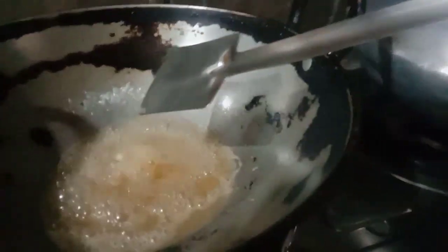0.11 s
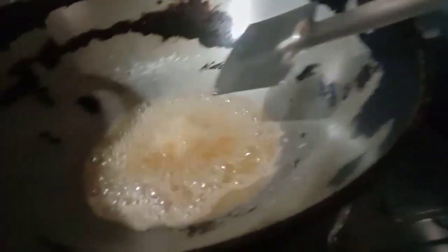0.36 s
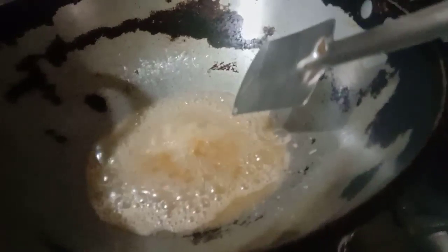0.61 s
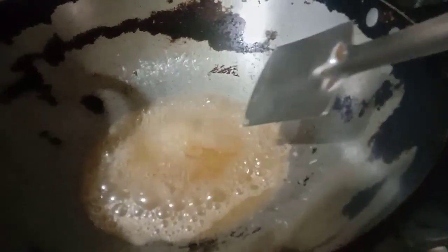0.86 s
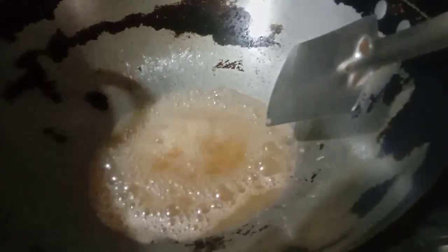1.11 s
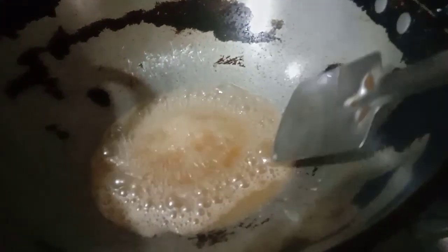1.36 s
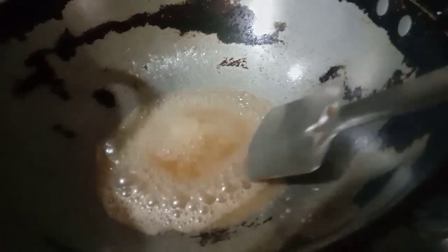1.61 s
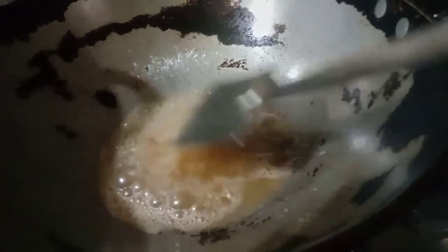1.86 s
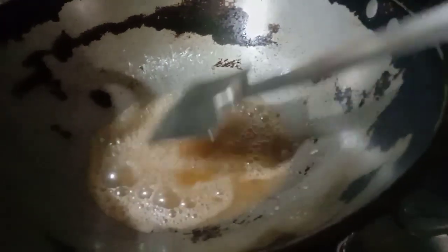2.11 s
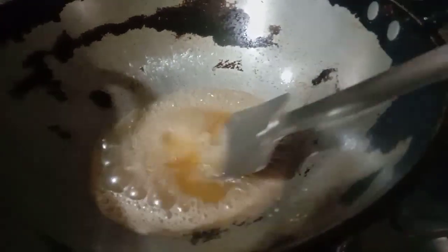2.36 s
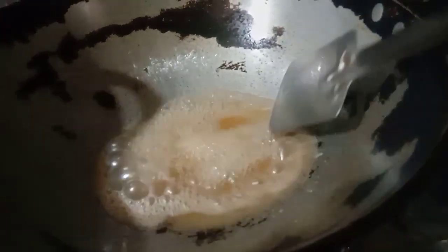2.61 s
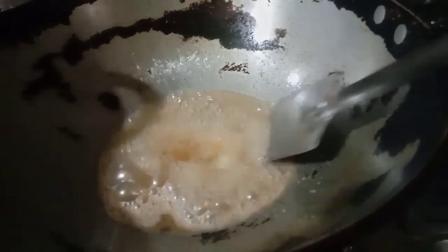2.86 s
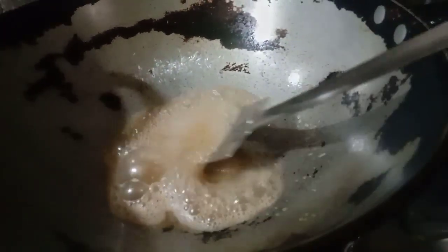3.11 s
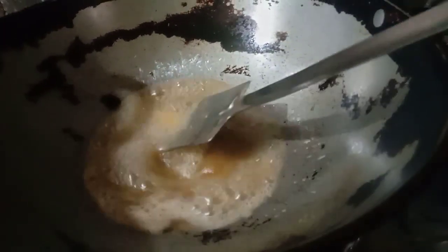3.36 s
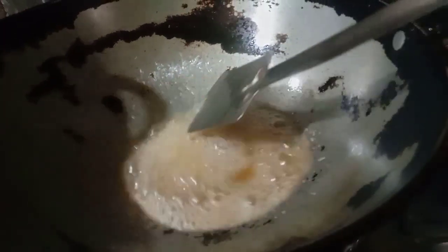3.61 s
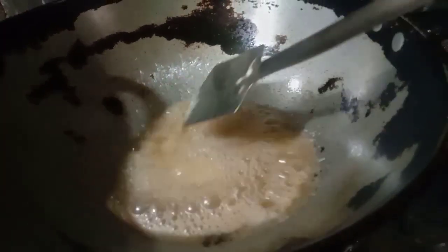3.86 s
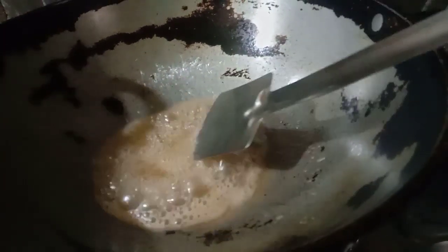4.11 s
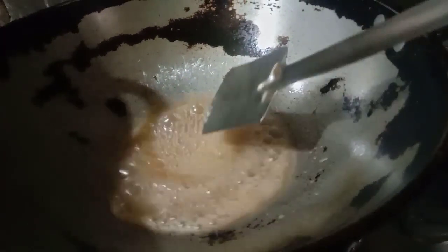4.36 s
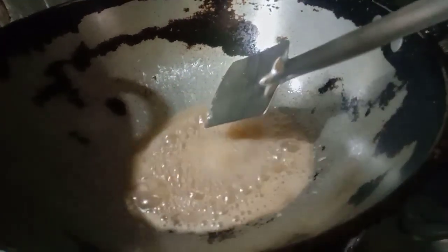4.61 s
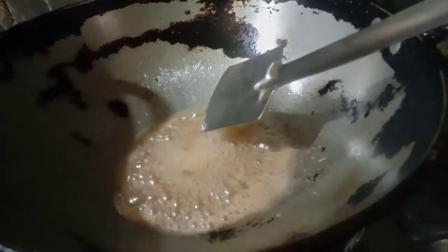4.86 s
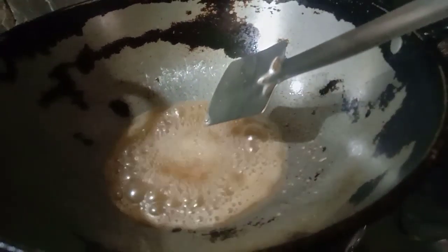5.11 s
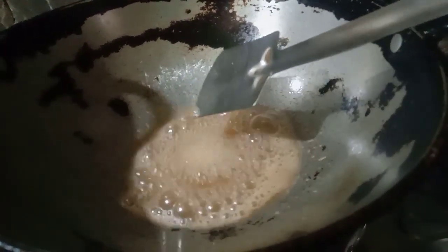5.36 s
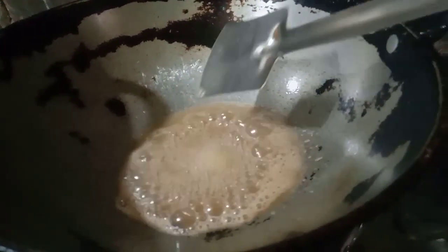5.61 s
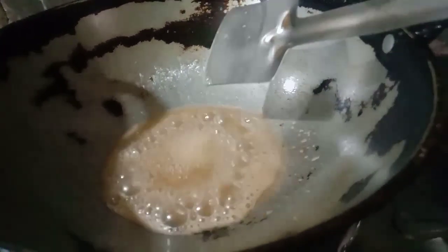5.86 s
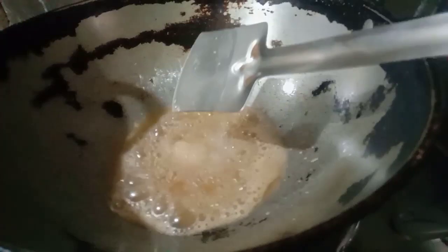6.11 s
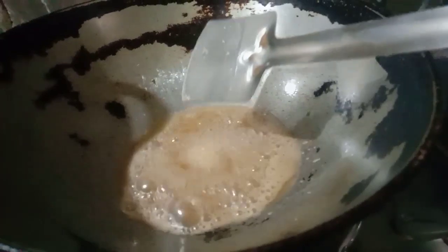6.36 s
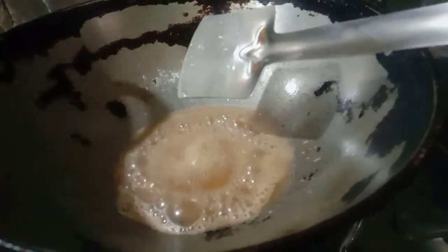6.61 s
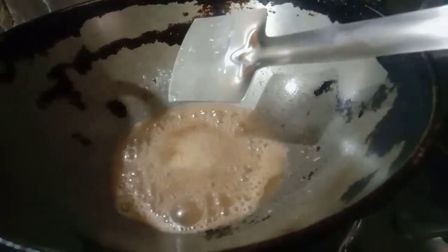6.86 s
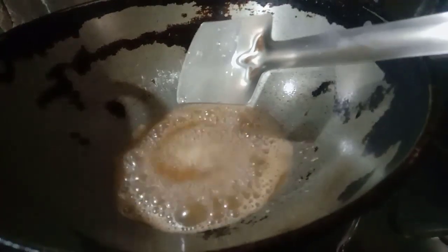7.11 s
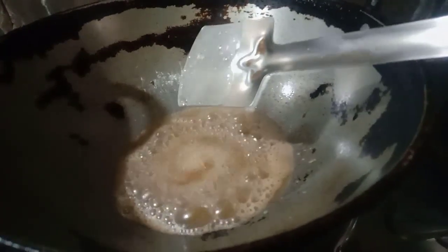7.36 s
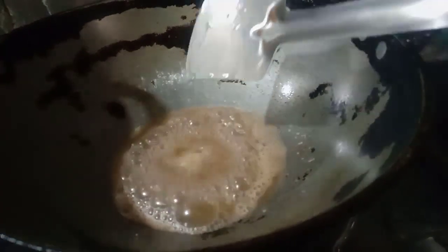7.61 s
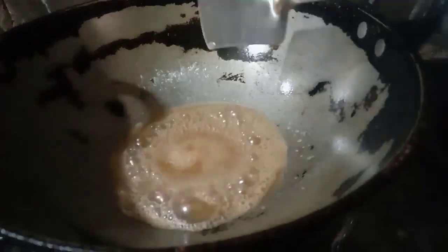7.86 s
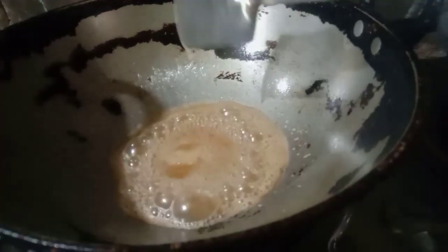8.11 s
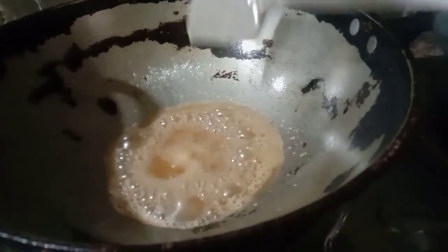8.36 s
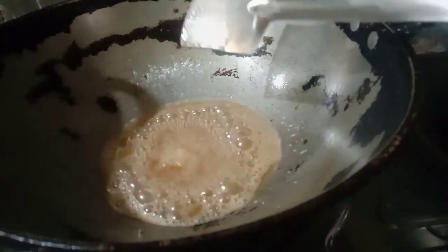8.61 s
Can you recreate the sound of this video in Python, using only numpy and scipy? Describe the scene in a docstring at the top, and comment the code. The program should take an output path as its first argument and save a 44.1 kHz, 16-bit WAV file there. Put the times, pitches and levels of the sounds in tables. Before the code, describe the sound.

Butter foaming in hot oil sizzles brightly and steadily, crackling with sharp pops while a metal spatula faintly rubs the steel pan.

```python
"""At a kitchen stove: butter foams in hot oil in a wide steel pan, the microphone close above it.
Countless small bubbles, damped sines fired at random, burst into a bright sizzle; larger ones pop and
spit, and a few deep ones plop. All of them ring the pan faintly through narrow resonances.
A metal spatula rubs the pan now and then: low shudders of noise, two short groans, a drag and one soft
bump. A faint low room noise lies behind."""
import sys
import numpy as np
from scipy import signal
from scipy.fft import rfft, irfft
from scipy.io import wavfile
from scipy.ndimage import uniform_filter1d

SR = 44100
rng = np.random.default_rng(int(sys.argv[2]) if len(sys.argv) > 2 else 0)


def master_out(mix):
    """Clip the mix to full scale and print it as 16-bit PCM to the path in sys.argv[1]."""
    frames = np.transpose(np.atleast_2d(mix))
    ceiling = np.clip(frames, -1, 1)
    pcm = np.round(ceiling * 32767).astype(np.int16)
    wavfile.write(sys.argv[1], SR, pcm)


def gain_from_db(level_db):
    """Turn a decibel level (scalar or array-like) into a linear amplitude factor."""
    decades = np.asarray(level_db, float) / 20
    return 10 ** decades


N = 384993


def evened(x):
    """Scales a sound to rms 1."""
    return x / np.sqrt(np.mean(x ** 2) + 1e-20)


def read_spectrum(points, hz):
    """Reads a table of (f/Hz, level/dB) at any frequency, on a logarithmic frequency scale."""
    f, value = np.transpose(points)
    return np.interp(np.log(hz + 1), np.log(f + 1), value)


def curve(rows, column):
    """Draws one column of a table over the whole scene; the first column is t/s."""
    rows = np.array(rows)
    return np.interp(np.arange(N) / SR, rows[:, 0], rows[:, column])


def add(mix, start_s, sound):
    """Lays a sound into the mix at its start time, cut at the end of the scene."""
    part = mix[round(start_s * SR):][:len(sound)]
    part += sound[:len(part)]


def ring(x, modes):
    """Passes x through resonances, each of gain near 1 at its centre before its own level."""
    out = np.zeros(len(x))
    for k, (hz, width_hz, db) in enumerate(modes):
        pole = np.exp(np.pi * (2j * hz - width_hz) / SR)
        resonance = 2 * signal.lfilter([1 - abs(pole)], [1, -pole], x).real
        out += (-1) ** k * gain_from_db(db) * resonance  # neighbours alternate in sign
    return out


def wander(fastest_hz):
    """Slow random curve of rms 1; the spectrum is down to half at fastest_hz."""
    hz = np.fft.rfftfreq(N, 1 / SR)
    slow = rfft(rng.standard_normal(N)) / (1 + (hz / fastest_hz) ** 2)
    return evened(irfft(slow, N))


def bubble(hz, cycles, glide):
    """A bursting bubble: a damped sine that rises in pitch as the cavity opens; peak near 1."""
    turns = np.arange(1200) * hz / SR
    shape = (1 - np.exp(-2 * turns)) * np.exp(-turns / cycles)
    rise = 1 + glide * np.minimum(turns / cycles, 3)
    return shape / shape.max() * np.sin(2 * np.pi * turns * rise)


def echoes(x, t60=0.15, wet_db=-7):
    """Near echoes off pan wall and stove: sparse taps of random sign, new ones for each spot in the pan."""
    taps, at = np.zeros(3400), np.arange(30, 3360, 22)
    taps[at + rng.integers(0, 22, len(at))] = rng.choice([-1., 1.], len(at))
    taps *= gain_from_db(-60 * np.arange(3400) / SR / t60)
    taps *= gain_from_db(wet_db) / np.linalg.norm(taps)
    taps[0] = 1  # the direct sound
    return signal.fftconvolve(x, taps)


# spectrum of the sizzle, relative within each band of bubble sizes: f/Hz, level/dB per Hz
SIZZLE = [(500, -32.5), (600, -25.5), (1000, -19.5), (1550, -16), (1750, -9.5), (2200, -10.5), (3000, -5),
          (4400, 0), (5000, 4.5), (7200, 4), (7900, -1.5), (10100, -3), (11500, -9.5), (14800, -21),
          (15800, -23)]
# boiling level of the main bubbles, 3200 to 8000 Hz: t/s, level/dB
BOILING = [(0.0, -17.5), (0.19, -21.5), (0.41, -19.5), (1.95, -21), (1.97, -20.5), (2.04, -21), (3.38, -18),
           (3.47, -21.5), (3.6, -19.5), (4.42, -21), (6.49, -20.5), (6.85, -20), (6.9, -20.5),
           (7.34, -21.5), (7.39, -21), (7.95, -21.5), (8.66, -21.5), (8.73, -20)]
# the other sizes: t/s, largest (below 780 Hz) level/dB, large (780-3200 Hz) level/dB, smallest level/dB
SIZE_LEVELS = [(0.0, -54, -34.5, -23.5), (0.36, -51, -34, -26), (1.29, -51.5, -34.5, -25.5),
               (3.14, -50, -31, -26.5), (3.38, -53, -31.5, -26.5), (3.4, -54.5, -31, -28),
               (4.52, -53.5, -35, -28.5), (5.13, -60.5, -37, -28), (6.47, -54, -35, -27),
               (6.59, -58.5, -37.5, -26), (6.9, -52, -36.5, -24.5), (7.9, -66, -37.5, -28.5),
               (8.53, -65, -35, -25), (8.73, -58, -39.5, -28)]


def foam(count=36, per_s=12000, spread_db=2.5, gust_db=1.0, patch_db=1.0, cycles=2.25):
    """Bubbles of many sizes burst at random; neighbours in size come in clusters."""
    out, power = np.zeros(N), 1e-9
    gust, patches = wander(60), [wander(12) for _ in range(6)]
    pitches = np.geomspace(600, 14000, count)
    for k, pitch in enumerate(pitches):
        bursts_of_size = round(N / SR * per_s * pitch / pitches.sum())  # small bubbles are the most frequent
        at = rng.integers(0, N, bursts_of_size)
        strength_db = spread_db * np.minimum(rng.exponential(1, len(at)), 5)
        cluster_db = gust_db * gust[at] + patch_db * patches[6 * k // count][at]
        impulses = np.zeros(N)
        impulses[at] = gain_from_db(strength_db) * rng.choice([-1, 1], len(at))
        impulses[at] *= gain_from_db(cluster_db)
        grain = echoes(bubble(pitch, cycles * rng.uniform(0.62, 1.49), 0.069))
        out += signal.oaconvolve(impulses, grain)[:N]
        power = power + pitch * abs(rfft(grain, 8192)) ** 2

    # the share of each bubble size follows the sizzle spectrum
    hz = np.fft.rfftfreq(N, 1 / SR)
    grain_spectrum = np.sqrt(uniform_filter1d(power, size=40))
    share = gain_from_db(read_spectrum(SIZZLE, hz)) / np.interp(hz, np.fft.rfftfreq(8192, 1 / SR), grain_spectrum)
    spectrum = rfft(out) * share * (hz > 300)

    below = [1 / (1 + (hz / edge_hz) ** 16) for edge_hz in (780, 3200, 8000)]
    surge_db = lulls()  # quick changes carry all sizes along
    main = evened(irfft(spectrum * (below[2] - below[1]), N))
    out = gain_from_db(curve(BOILING, 1) + surge_db) * main
    for k, band in enumerate((below[0], below[1] - below[0], 1 - below[2])):
        out += gain_from_db(curve(SIZE_LEVELS, k + 1) + surge_db) * evened(irfft(spectrum * band, N))
    return out


# the sizzle dips briefly: middle t/s, depth/dB, length/s between the points where 1/e of the depth is left
DIPS = [(0.141, 7.5, 0.027), (0.562, 1, 0.029), (1.864, 4.5, 0.038), (2.185, 3, 0.041), (2.31, 0, .06),
        (2.392, 4, 0.053), (2.71, 3, 0.036), (3.905, 1.5, 0.033), (4.551, 4.5, 0.018), (4.573, 3, 0.028),
        (4.786, 1.5, 0.033), (4.92, 4, 0.064), (5.11, 2, 0.02), (5.216, 2.5, 0.039), (5.509, 5.5, 0.02),
        (6.616, 3, 0.056), (6.727, 1.5, .06), (6.834, 4.5, 0.091), (7.31, 3, 0.045), (7.593, 4, .025),
        (7.64, 5, 0.032)]


def lulls():
    """Quick change of the boiling in dB: short dips and a light random flutter."""
    flutter_db, flutter_hz = 0.42, 9.6
    t = np.arange(0, N / SR, .002)
    dips = sum(db * np.exp(-(2 * (t - s) / length) ** 2) for s, db, length in DIPS)
    return flutter_db * wander(flutter_hz) - np.interp(np.arange(N) / SR, t, dips)


# the loudest single bubbles: t/s, ring peak level/dB before crack, echoes and band limit, starting f/Hz
POPS = [(0.353, -15, 3320), (0.392, -27, 1490), (0.406, -11, 1960), (0.4324, -6, 3000),
        (0.5555, -10.5, 2920), (0.9138, -8, 5400), (1.074, -14, 2810), (1.4552, -14.5, 2520),
        (1.596, -4, 5070), (1.6015, -14.5, 1830), (1.84, -12, 5480), (1.9555, -5, 5620), (2.1096, -5, 5710),
        (2.145, -2, 5140), (2.2313, -10, 3240), (2.4348, -4, 7130), (2.4794, -6.5, 2800),
        (2.5326, -6.5, 3180), (2.582, -11, 2380), (2.638, -9, 3080), (2.676, -13, 3070),
        (2.7176, -5.5, 3520), (2.7571, -5.5, 3380), (2.7894, -7.5, 3160), (2.828, -7, 3000),
        (2.8777, -12, 5100), (2.8838, -5, 3020), (2.953, -9, 5660), (2.9841, -8.5, 3080),
        (3.2895, -11, 2790), (3.3337, -8, 3200), (3.3785, -5, 3520), (3.384, -11, 3700),
        (3.4234, -4.5, 4610), (3.6301, -7, 5450), (3.9547, -12, 5900), (4.0158, -12, 5470),
        (4.1676, -12, 2340), (4.226, -13, 5200), (4.2506, -7, 5000), (4.3787, -15, 4930),
        (4.4568, -12, 3270), (4.5577, -9, 5930), (4.7012, -6.5, 3500), (4.735, -9, 4270),
        (4.814, -12, 2370), (4.8324, -11, 3180), (4.8868, -6.5, 5660), (4.9345, -6.5, 4770),
        (5.045, -10, 5000), (5.21, -6, 6100), (5.3552, -10, 4920), (5.4209, -7, 2500), (5.5134, -3, 5260),
        (5.6655, -13, 2640), (5.671, -4, 5500), (5.695, -5.5, 6050), (5.7258, -5, 5000), (5.75, -16, 5200),
        (5.766, -9, 3960), (5.866, -10.5, 3280), (5.8895, -5, 4250), (5.9638, -18, 5940),
        (6.3579, -11, 3280), (6.37, -11, 4200), (6.438, -7, 4460), (6.7131, -10, 6910), (6.7517, -10, 6460),
        (6.8054, -6.5, 2250), (6.836, -7, 6000), (6.8872, -5, 6960), (6.9581, -6, 5200), (6.968, -11, 4800),
        (7.2366, -12.5, 3140), (7.3076, -7, 4930), (7.52, -5, 4370), (7.5877, -12, 5370),
        (7.6176, -3.5, 6000), (7.673, -9.5, 3830), (7.7095, -12, 6000), (7.7817, -17, 2600),
        (7.9206, -15, 3270), (7.9694, -8, 2720), (8.0735, -7, 6230), (8.113, -15, 2640), (8.35, -4.5, 4600),
        (8.593, -4, 7000), (8.637, -14.5, 3170)]


def bursts(low_hz=1200):
    """Single loud bubbles, each with a short crack of noise at its start; they radiate little bass."""
    ring_s, crack, crack_hz = 0.00052, 0.2, 2500  # every bubble rings as long; the larger, the more crack
    rows = POPS + strays()
    out = np.zeros(N)
    for (s, db, hz), noise in zip(rows, rng.standard_normal((len(rows), 1200))):
        snap = crack * np.sqrt(crack_hz / hz) * noise * np.exp(-np.arange(1200) / 30)
        pop = bubble(hz, ring_s * hz, 0.012) + snap
        add(out, s, gain_from_db(db) * echoes(pop, t60=0.15, wet_db=-2))
    band = signal.butter(3, [low_hz, 10500], "band", fs=SR, output="sos")
    return signal.sosfilt(band, out)


def strays():
    """Further single bubbles at random moments, as rows of t/s, level/dB, f/Hz."""
    per_s, level_db, spread_db = 20, -11.5, 1.5
    low_hz, top_hz = 3400, 7470
    when, size, pitch = rng.random((round(per_s * N / SR), 3)).T
    levels_db = level_db + spread_db * (2 * size - 1)
    return list(zip(when * N / SR, levels_db, low_hz * (top_hz / low_hz) ** pitch))


# rare deep bubbles: t/s, peak level/dB before echoes, starting f/Hz
PLOPS = [(0.382, -27, 1030), (0.479, -40, 850), (0.985, -43, 860), (2.641, -34, 842), (2.843, -39, 860),
         (2.945, -34, 860), (3.29, -36, 624), (3.334, -44, 1080), (4.428, -37, 606), (4.813, -38, 842),
         (5.305, -36, 810), (5.42, -32, 1010), (5.686, -31, 1150), (6.116, -35, 964), (6.357, -34, 1020),
         (6.982, -34, 993), (7.803, -39, 1010), (7.939, -41, 990), (8.044, -35, 970), (8.102, -35, 1030),
         (8.312, -35, 977), (8.37, -35, 1000), (8.431, -40, 961), (8.554, -40, 953)]


def plops():
    """Deep bubbles that die away over 3.4 cycles, longer in time than the pops."""
    out = np.zeros(N)
    for s, db, hz in PLOPS:
        add(out, s, gain_from_db(db) * echoes(bubble(hz, 3.4, .01)))
    return out


# resonances of the pan wall: f/Hz, width/Hz, level/dB relative to one another
PAN_MODES = [(644, 10, -1), (827.6, 11, 19), (1010, 10, 11.5), (1393, 15, -2), (1779, 17.7, 9.5),
             (2060, 13, -13), (2484, 6.7, 8.5)]


def pan(bubbles):
    """The steel wall rings in a few narrow modes, driven by every bubble."""
    return gain_from_db(-6) * ring(bubbles, PAN_MODES)


# strokes shake three parts of pan and stove: start t/s, length/s, deep, middle and light level/dB
STROKES = [(.39, 0.033, -72, -70, -69), (.63, .08, -82, -87, -58), (.86, 0.12, -82, -72, -63),
           (1.39, 0.2, -74, -77, -57), (1.588, .07, -72, -74, -57), (1.928, .08, -76, -75, -61),
           (2.055, .05, -80, -85, -59), (2.21, 0.24, -79, -79, -57), (2.72, 0.15, -57, -64, -61),
           (2.81, 0.29, -68, -61.5, -52), (3.145, 0.11, -61, -57, -57), (3.285, 0.058, -56, -61, -74),
           (3.327, .08, -65, -54, -71), (3.45, 0.28, -77, -86, -67), (4.07, 0.12, -57, -63, -59),
           (4.185, .05, -57, -68, -75), (4.29, 0.085, -59, -70, -77), (4.62, .14, -70, -72, -71),
           (5.42, .12, -82, -68, -75), (6.155, 0.045, -80, -85, -61), (6.97, 0.27, -57, -55.5, -59.5),
           (8.24, 0.11, -52, -57, -60), (8.34, .09, -64, -70, -76)]
# modes of the deep, middle and light part, for each of two passes: f/Hz, width/Hz, level/dB (relative)
SHUDDER_MODES = [
    [(104.4, 29, 0)],
    [(183, 45, 0)],
    [(279, 20, -1), (335, 26, 2)],
]


def shudders():
    """Spatula strokes rub the pan: noise in the low modes, swelling above a faint idle shaking."""
    rest_db, edge = (-80, -81.5, -83.5), 0.66  # edge: share of a stroke spent rising and falling
    out, press = np.zeros(N), gain_from_db(rest_db)[:, None] * np.ones(N)
    for start, length, *dbs in STROKES:
        stroke = signal.windows.tukey(round(length * SR), edge)
        for part, db in zip(press, dbs):
            add(part, start, gain_from_db(db) * stroke)
    for part, modes in zip(press, SHUDDER_MODES):
        rubbing = ring(ring(rng.standard_normal(N), modes), modes)
        out += part * evened(rubbing)
    return out


# two groans: start t/s, length/s, first f/Hz, rms level/dB before waver and fades
GROANS = [(2.59, .21, 168.6, -51), (3.11, 0.18, 163, -52)]


def groans():
    """Steady stick-slip of the spatula: sine tones that rise in pitch and waver in level."""
    rise_hz_per_s, waver_db = 55, 2
    out, waver = np.zeros(N), wander(25)
    for start, length, hz, db in GROANS:
        t = np.arange(0, length, 1 / SR)
        tone = np.sin(2 * np.pi * (hz + rise_hz_per_s * t / 2) * t) * signal.windows.tukey(len(t), .35)
        level = gain_from_db(db + waver_db * waver[round(start * SR):][:len(t)])
        add(out, start, np.sqrt(2) * level * tone)
    return out


# modes of the soft blow: f/Hz, level/dB before onset and decay, t60/s
BUMP_MODES = [(109, -39, 0.22), (186, -27, 0.11), (326, -49, 0.23)]


def bump():
    """One soft blow of the spatula: low decaying sines with a rounded onset."""
    out, t = np.zeros(N), np.arange(SR // 4) / SR
    shake = sum(gain_from_db(db - 60 * t / t60) * np.sin(2 * np.pi * hz * t) for hz, db, t60 in BUMP_MODES)
    add(out, 8.243, (1 - np.exp(-(t / 0.01) ** 2)) * shake)
    return out


# the drag: start t/s, end t/s, top f/Hz, rms level/dB before the fades
DRAG = (3.78, 4, 700, -50)


def scrape():
    """One short dull drag of the blade over the pan: band-limited noise that swells and fades."""
    start, end, top_hz, db = DRAG
    noise, out = rng.standard_normal(round((end - start) * SR)), np.zeros(N)
    drag = signal.sosfilt(signal.butter(2, [200, top_hz], "band", fs=SR, output="sos"), noise)
    add(out, start, gain_from_db(db) * evened(drag) * np.hanning(len(drag)))
    return out


# spectrum of the room noise: f/Hz, level/dB per Hz (relative)
ROOM = [(15, -41), (25, -10), (70, -7.5), (144, -7), (240, -10.5), (294, -14), (325, -5.5), (450, -14.5),
        (560, -19), (680, -41), (1140, -120)]


def kitchen():
    """A faint low room noise: shaped random noise at -71 dB rms."""
    hz = np.fft.rfftfreq(N, 1 / SR)
    shaped = rfft(rng.standard_normal(N)) * gain_from_db(read_spectrum(ROOM, hz))
    return gain_from_db(-71) * evened(irfft(shaped, N))


def scene():
    """Foam and single bubbles ring the pan; spatula and room lie below."""
    bubbles = foam() + bursts() + plops()
    frying = bubbles + pan(bubbles)
    thin = signal.butter(8, 540, "high", fs=SR, output="sos")  # the shallow fat gives no bass
    spatula = shudders() + groans() + bump() + scrape()
    return (signal.sosfilt(thin, frying) + spatula + kitchen())[None]


def low_pass(x):
    """Removes everything above the highest recorded frequency."""
    return signal.sosfilt(signal.butter(12, 15920, fs=SR, output="sos"), x)


def record(dry):
    """The microphone's input stage rounds off peaks towards a ceiling, then the treble is cut at 15.8 kHz."""
    ceiling = 0.71  # amplitude
    rounded = dry / (1 + abs(dry / ceiling) ** 6) ** (1 / 6)
    edge = signal.firwin(511, 15800, window=("kaiser", 9), fs=SR)
    mix = signal.oaconvolve(rounded, edge[None], "same")
    return low_pass(mix)


dry = scene()
out = record(dry)
master_out(out)
```